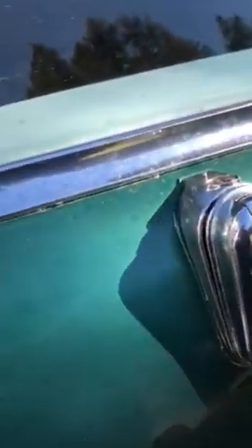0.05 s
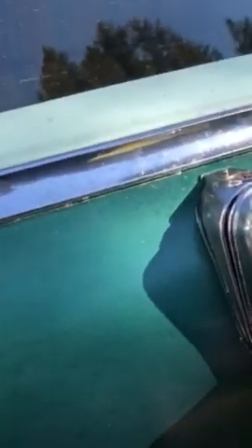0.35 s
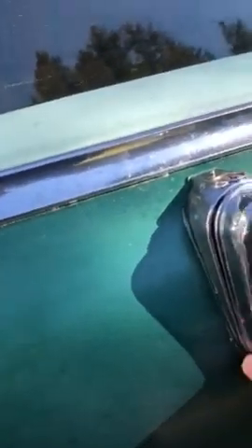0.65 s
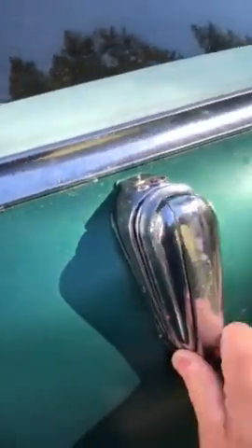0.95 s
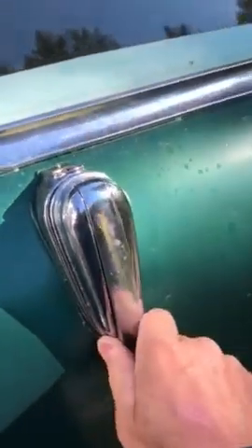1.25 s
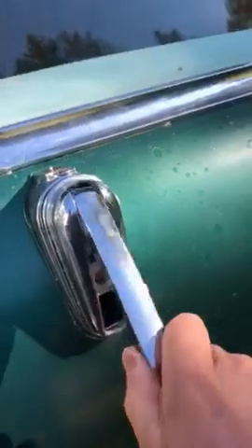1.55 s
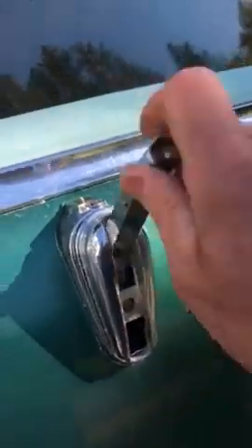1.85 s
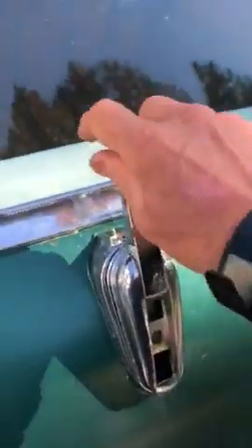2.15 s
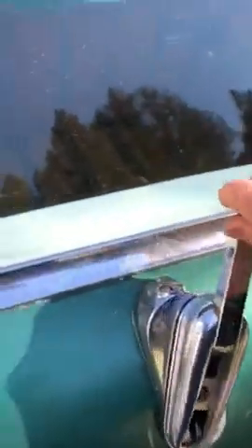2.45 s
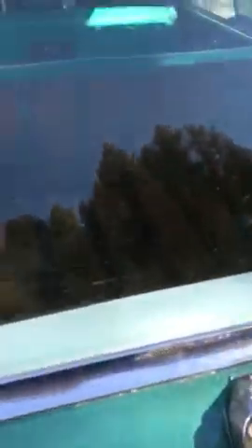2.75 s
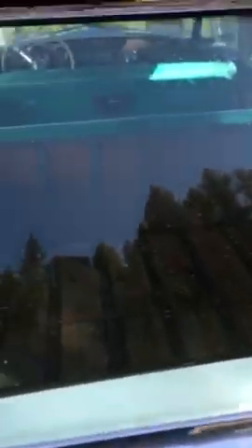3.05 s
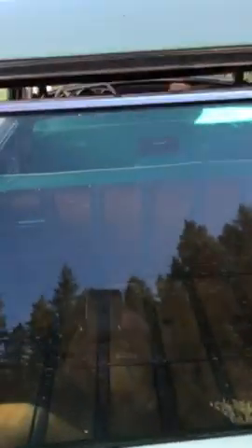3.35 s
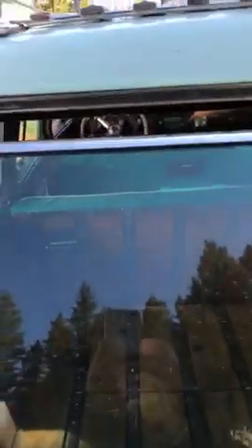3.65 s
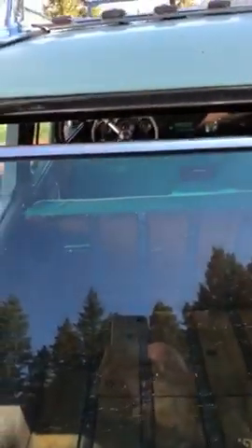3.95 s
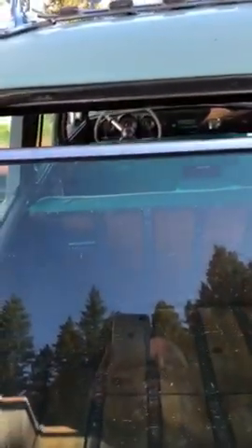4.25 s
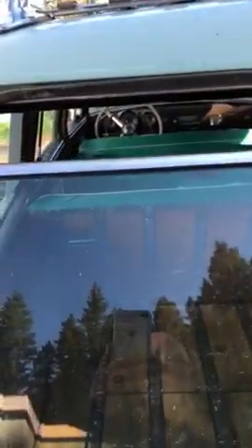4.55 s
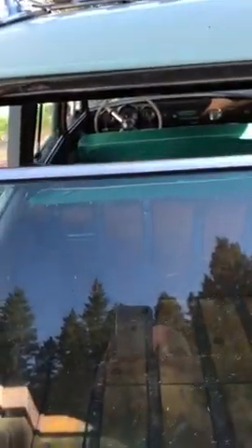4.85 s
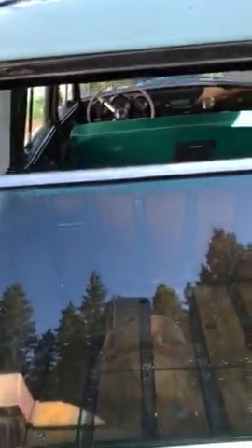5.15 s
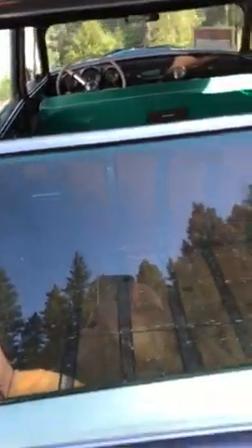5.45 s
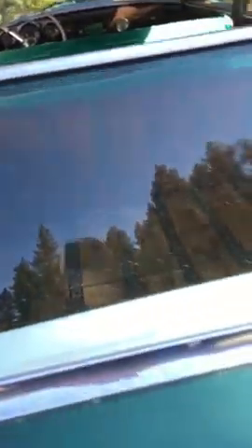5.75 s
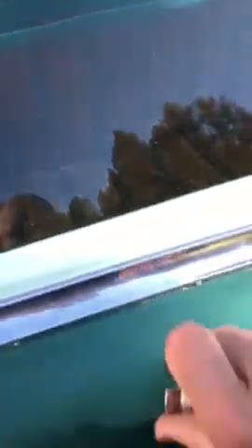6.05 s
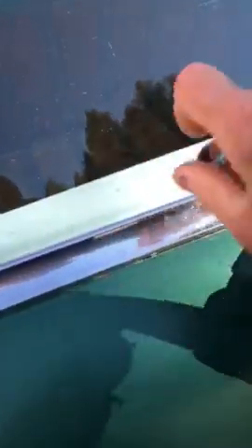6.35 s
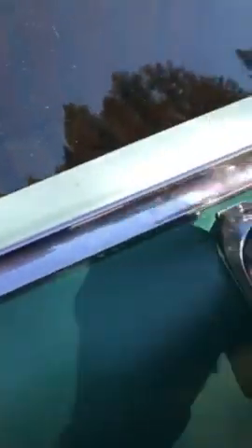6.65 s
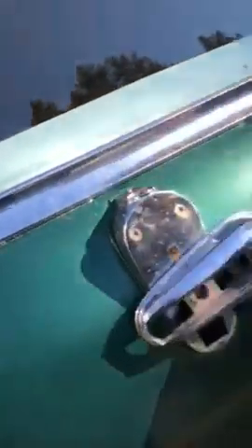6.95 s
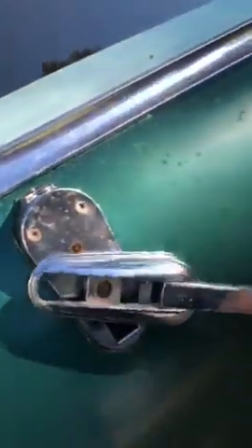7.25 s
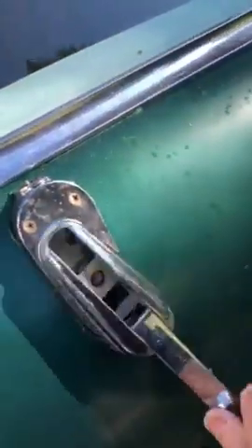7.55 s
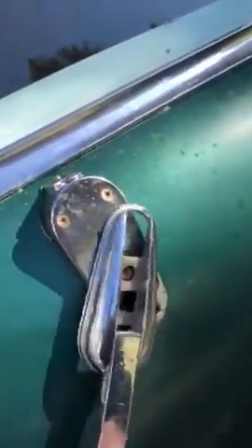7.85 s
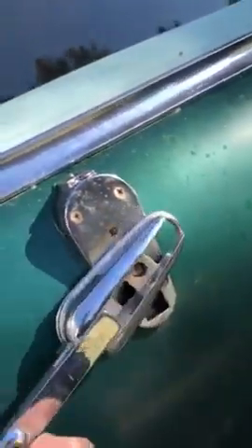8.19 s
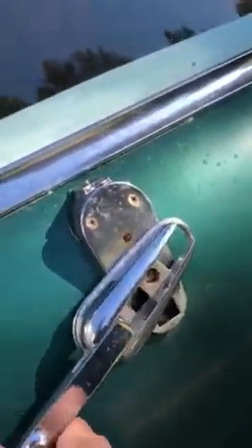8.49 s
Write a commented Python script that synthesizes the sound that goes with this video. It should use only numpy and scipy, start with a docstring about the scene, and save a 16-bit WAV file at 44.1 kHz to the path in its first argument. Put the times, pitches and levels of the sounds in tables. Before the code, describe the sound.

Close and dry, a chrome handle lock on an old vehicle clicks, squeaks on its pivot and snaps open with a short metallic ring. The hollow body gives soft low booms as a hand rubs over it, with scattered ticks and chinks of loose parts. Near the end the lever turns with a soft rub and a few more thumps. Faint open air and a far bird lie behind.

```python
"""A soft boom and the rub of a hand on the sheet-metal body of an old vehicle, outdoors.
The hand unfolds the chrome lever of a lock: it clicks, scrapes, squeaks on its pivot and snaps
against its stop. The body knocks and booms as the lock is worked and the lever is swung round,
rubbing; loose parts chink. Behind it: faint air, a thin high hiss and a far bird's few thin notes."""
import sys
import numpy as np
from scipy import signal
from scipy.fft import rfft, irfft, next_fast_len
from scipy.io import wavfile
from scipy.ndimage import map_coordinates

SR = 44100
rng = np.random.default_rng(int(sys.argv[2]) if len(sys.argv) > 2 else 0)


def generate_wav(signal):
    """Clip the signal to [-1, 1] and save it as 16-bit WAV at the path in sys.argv[1]."""
    frames = np.transpose(np.atleast_2d(signal))
    scaled = np.clip(frames, -1, 1) * 32767
    pcm = np.round(scaled).astype(np.int16)
    wavfile.write(sys.argv[1], SR, pcm)


N = 375732
T = np.arange(N) / SR

# air and far hiss over time: t/s, level/dB
AIR_LEVEL = [(0, -81.5), (1.3, -80), (2.6, -78.5), (4.2, -76.5), (7, -76), (8.52, -79)]
HISS_LEVEL = [(0, -81), (1.1, -82.5), (1.5, -86.5), (8.52, -100)]
# hoarse falling bird call: t/s, f/Hz, level/dB
BIRD_SLUR = [(1.13, 3520, -85), (1.185, 3440, -69), (1.21, 3100, -80), (1.24, 2570, -73), (1.29, 2300, -84)]
# whistled notes: t/s, length/s, first f/Hz, settled f/Hz, level/dB
BIRD_WHISTLES = [(4.593, 0.25, 4240, 3900, -72.5), (4.83, .18, 3900, 3870, -72.5),
                 (5.11, 0.24, 3290, 3365, -72), (5.328, .23, 3460, 3390, -75)]

# spectral shape of each source: f/Hz, relative level/dB
AIR_TONE = [(100, -2.5), (1000, 4.5), (2000, 4), (3400, 1), (5700, -3.5), (9000, -7), (15500, -11.5)]
HISS_TONE = [(3500, -29.5), (5300, -18.5), (7500, -31.5)]
RUMBLE_TONE = [(20, -26.5), (55, -2), (110, 1.5), (190, -0.5), (280, -13.5), (500, -29.5), (1500, -55)]
RUB_TONE = [(100, -18.5), (250, 4), (500, 1), (1100, -6.5), (2000, -16), (4000, -27.5), (9000, -36.5),
            (16000, -57)]
SWIVEL_TONE = [(400, -15.5), (950, 1.5), (1500, -6.5), (4000, -17), (9000, -25), (16000, -38)]
FLEX_TONE = [(22, -19.5), (52, 6), (110, -6), (220, -5), (400, -25.5), (1500, -74)]
SCRAPE_TONE = [(150, -13), (700, 13), (1700, 2.5), (3500, -8.5), (6000, -21), (8500, -23), (15500, -31)]
PANEL_TONE = [(80, -34), (220, 6), (500, 0), (900, 1), (1500, -7.5), (2500, -17), (5000, -32.5),
              (16000, -48.5)]
STEEL_TONE = [(100, -18), (400, -3), (1000, 5), (2000, 5), (3500, -6), (5000, -6), (6500, -22), (8000, -37),
              (16000, -47)]
CRACK_TONE = [(3000, 5), (6500, -1), (8500, 6), (11000, -3.5), (13000, -10.5), (15500, -5.5)]
# resonances of panel, steel lever and lock housing: f/Hz, width/Hz, lift/dB
PANEL_MODES = [(404, 26, 5), (484.7, 15, 10), (622.5, 10.5, 8.5), (728, 58, 3), (817, 18, 8),
               (917, 46, 5.5), (1160, 14, 5), (1230, 47, 5.5), (1240, 58, 3.5), (1444, 15, -6),
               (1710, 20, -7)]
STEEL_MODES = [(1710, 270, 6.1), (2010, 140, 11.4), (2500, 73, 3.9), (3270, 230, 9), (3900, 170, 4.9),
               (5580, 310, 9.8), (6240, 210, 9.7), (8150, 360, 3.8), (9000, 300, 4.3), (13000, 340, 7),
               (13900, 200, 5)]
HOUSING_MODES = [(966, 70, 11), (1145, 59, 9.4), (2150, 340, 9.5), (2990, 110, 12), (3780, 180, 12),
                 (8260, 270, 5.7)]
# lever ringing on its stop: f/Hz, level/dB, t60/s
STOP_MODES = [(480, -41, 0.18), (611, -37, 0.14), (1140, -46, 0.12), (1274, -42, 0.096), (740, -38, 0.071),
              (1998, -31, 0.051), (3170, -32.5, 0.032), (3290, -31.5, 0.026), (3290, -56, 0.14),
              (4070, -38.5, 0.035), (6290, -48, 0.046), (12960, -36, 0.022), (14800, -40, .014)]

# movements: peak t/s, level/dB, rise and fall time constant/s
HAND_STROKES = [(0, -54, 0.11), (0.28, -63.5, 0.089), (1.58, -56, 0.1), (2.08, -57.5, 0.21),
                (2.98, -54, 0.12), (3.3, -62.5, 0.093), (3.73, -63, 0.089), (4.39, -66, 0.32),
                (5.38, -64.5, 0.19), (5.93, -63.5, 0.16), (7.58, -63.5, 0.23), (8.52, -63.5, 0.053)]
LOCK_TURNS = [(7.1, -75, 0.3), (7.43, -66.5, 0.068), (7.6, -65, 0.07), (8.07, -67, 0.29)]
FINGER_SLIDE = [(8.13, -69, .07)]
STEEL_SCRAPES = [(1.49, -55, .025), (1.64, -53, 0.014), (1.9, -60, 0.014), (2.075, -49.5, 0.019),
                 (2.915, -57.5, 0.039), (5.39, -64.5, .06), (7.43, -68, .04)]
# loose parts landing: t/s, level/dB, f/Hz
CHINKS = [(0.379, -71, 8250), (1.829, -57.5, 2400), (1.829, -67, 4300), (2.068, -63, 8260),
          (4.572, -65, 5090), (4.597, -71, 5090), (4.597, -72, 11283), (4.679, -69, 11283),
          (4.716, -63, 11350), (4.76, -70, 11283), (5.345, -75.5, 9050), (5.4, -75, 9050),
          (6.492, -70, 6570), (6.579, -72, 6700), (6.627, -72, 6570)]
# steel-on-steel clicks: t/s, level/dB, centre f/Hz
TICKS = [(0.338, -46.5, 1290), (1.461, -52, 1300), (1.5161, -33.5, 1700), (1.6262, -55, 1900),
         (1.6432, -50, 1900), (1.745, -51.5, 3470), (1.829, -42.5, 1900), (2.0395, -49, 1900),
         (2.0683, -38.5, 2100), (2.292, -48, 830), (2.42, -49, 2690), (2.518, -55, 3800),
         (2.582, -52.5, 3200), (2.635, -50, 900), (3.218, -61, 7900), (3.272, -53, 1100),
         (3.592, -51, 5200), (3.612, -56.5, 4840), (3.778, -59, 3530), (3.826, -60, 3130),
         (3.887, -53, 3040), (3.964, -48, 690), (4.013, -55.5, 1510), (4.571, -56, 4960),
         (4.572, -56, 13000), (5.755, -63, 4000), (7.41, -62, 2200), (7.545, -52, 450),
         (8.473, -49.5, 2070)]
# pivot squeak, one list per mode: t/s, f/Hz, level/dB
SQUEAKS = [
    [(1.575, 1387, -77), (1.607, 1318, -48), (1.622, 1237, -51), (1.647, 1243, -45.5), (1.69, 1216, -71)],
    [(1.67, 3400, -80), (1.7, 3550, -66), (1.725, 3320, -80)],
    [(1.705, 750, -68), (1.722, 728, -49.5), (1.76, 702, -45.5), (1.778, 718, -52.5), (1.83, 635, -52.5)],
]
# soft bumps that only boom the body: t/s, level/dB, f/Hz
BUMPS = [(0.003, -43, 141), (0.003, -48, 288), (0.003, -54.5, 527), (0.671, -42.5, 66.4),
         (0.872, -47.5, 78.6), (1.375, -47, 159.2), (1.41, -41, 161), (2.185, -35.5, 115.8),
         (2.471, -44.5, 123), (2.732, -35, 123), (2.968, -50.5, 445.3), (2.99, -41.5, 185.6),
         (3.97, -41, 128.7), (4.004, -41.5, 124.2), (4.998, -44.5, 131), (7.145, -46.5, 124.3),
         (7.195, -46.5, 75), (7.423, -44, 130.4), (7.537, -44.5, 95), (7.635, -37, 101.6)]
# blows of the lock: t/s, level/dB, hardness/0-1, boom f/Hz
KNOCKS = [(0.379, -53, 0.33, 92.5), (1.4986, -46.5, 1, 155.7), (1.8977, -46.5, 0.1, 117),
          (1.9197, -44.5, 0.77, 123.6), (1.948, -53, .6, 123.3), (2.101, -35.5, 0.94, 115.5),
          (2.9079, -52.5, 0.98, 136.3), (2.968, -52, 0, 117.5), (4.7029, -48.5, 0.58, 151.6),
          (5.317, -54, 0, 161.5), (5.4133, -52.5, 0.16, 182.2), (5.9035, -59, 0, 130.5),
          (6.5096, -47.5, 0.77, 149.5), (7.625, -54.5, 0.4, 101), (8.4731, -61.5, 0.1, 179)]


def amp(db):
    """Decibels to gain."""
    return 10 ** (np.asarray(db) / 20)


def unit(x):
    """Scale to rms 1."""
    return x / np.sqrt(np.mean(x ** 2) + 1e-20)


def noise():
    """White noise, rms 1."""
    return rng.standard_normal(N)


def curve(rows, column=1):
    """One column of a timed table, per sample."""
    rows = np.asarray(rows)
    return np.interp(T, rows[:, 0], rows[:, column])


def wobble(rate_hz):
    """Smooth random curve, rate_hz knots a second."""
    knots = rng.standard_normal(int(N * rate_hz / SR) + 2)
    fine = map_coordinates(knots, [np.arange(10 * len(knots)) / 10], mode="nearest")
    return np.interp(10 * rate_hz * T, np.arange(len(fine)), fine)


def swells(rows):
    """Gain of movements that rise to a peak and fall as fast."""
    return np.sqrt(sum((amp(db) * np.exp(-abs(T - s) / tau_s)) ** 2 for s, db, tau_s in rows))


def fade(t, t60_s, attack_s):
    """Rise and exponential decay, peak 1."""
    shape = amp(-60 * t / t60_s) * (1 - np.exp(-t / attack_s))
    return shape / shape.max()


def add(track, start_s, sound):
    """Mix a sound into the track."""
    start = max(0, round(start_s * SR))
    track[start:start + len(sound)] += sound[:N - start]


def colour(x, tone, modes=(), lift_scale=1, size=8192):
    """Minimum-phase filter from a spectrum and resonances; white noise keeps its power."""
    hz = np.fft.rfftfreq(size, 1 / SR)
    tone_hz, tone_db = np.transpose(tone)
    db = np.interp(np.log(hz + 1), np.log(tone_hz), tone_db)
    for centre_hz, width_hz, lift_db in modes:
        db += lift_scale * lift_db / (1 + (2 * (hz - centre_hz) / width_hz) ** 2)
    cepstrum = irfft(np.log(amp(db)))
    cepstrum[1:size // 2] *= 2
    cepstrum[size // 2 + 1:] = 0
    response = irfft(np.exp(rfft(cepstrum)))
    return signal.fftconvolve(x, response / np.linalg.norm(response))[:N]


def glide(rows, jitter, flutter_db, overtone_db):
    """Gliding tone with two overtones, unsteady in pitch and level."""
    out = np.zeros(N)
    on = (T > rows[0][0]) & (T < rows[-1][0])
    hz = curve(rows) * (1 + jitter * wobble(300))
    phase = 2 * np.pi * np.cumsum(hz[on]) / SR
    wave = sum(amp(k * overtone_db) * np.sin((k + 1) * phase) for k in range(3))
    level_db = curve(rows, column=2) + flutter_db * wobble(60)
    out[on] = amp(level_db[on]) * wave * signal.windows.tukey(len(wave), 0.1)
    return out


def blows(times_s, levels_db, t60_s, attack_s, tail_db, tail_t60_s, ripple_db, spacing_hz):
    """Dense bursts, a quick decay over a longer one; each contact point favours other modes."""
    out, t = np.zeros(N), np.arange(SR // 2) / SR
    hz = np.fft.rfftfreq(len(t), 1 / SR)
    shape = np.hypot(fade(t, t60_s, attack_s), amp(tail_db) * fade(t, tail_t60_s, attack_s))
    for s, db in zip(times_s, levels_db):
        ripple = map_coordinates(rng.standard_normal(1024), [hz / spacing_hz], mode="wrap")
        spectrum = rfft(rng.standard_normal(len(t))) * amp(ripple_db * ripple)
        add(out, s, amp(db) * shape * unit(irfft(spectrum, len(t))))
    return out


def outdoors():
    """Soft moving air and a thin far hiss."""
    air = amp(curve(AIR_LEVEL) + 1.5 + 0.5 * wobble(5)) * colour(noise(), AIR_TONE)
    hiss = amp(curve(HISS_LEVEL) + wobble(25)) * colour(noise(), HISS_TONE)
    return air + hiss


def bird(settle_s=0.06, arch_db=7, gain_db=-0.5):
    """A far bird: one hoarse slur, then pure notes that slide to pitch, softer at their ends."""
    song = glide(BIRD_SLUR, jitter=0.03, flutter_db=4.5, overtone_db=-35)
    for s, length_s, first_hz, settled_hz, db in BIRD_WHISTLES:
        t = np.linspace(0, length_s)
        hz = settled_hz + (first_hz - settled_hz) * np.exp(-t / settle_s)
        level_db = db - arch_db * (2 * t / length_s - 1) ** 2
        note = np.column_stack([s + t, hz, level_db])
        song += glide(note, jitter=0.0017, flutter_db=1, overtone_db=-42)
    return amp(gain_db) * song


def handling(rest_db=-71.5, rumble_rest_db=-62, rumble_exponent=0.95):
    """The hand rubs unevenly over the panel; a lumpy rumble rises with each stroke."""
    effort = np.hypot(amp(rest_db), swells(HAND_STROKES))
    friction = noise() * unit(amp(2.03 * wobble(70)))
    rub = effort * colour(friction, RUB_TONE, PANEL_MODES, lift_scale=0.36)
    lumps = unit(amp(3 * wobble(18))) * noise()
    rumble_gain = amp(rumble_rest_db) * (effort / amp(rest_db)) ** rumble_exponent
    return rub + rumble_gain * colour(lumps, RUMBLE_TONE)


def swivel(flex_db=8):
    """The lock grinds round in its hollow housing and flexes the panel; fingers hiss on the chrome."""
    friction = noise() * unit(amp(3 * wobble(70)))
    grind = colour(friction, SWIVEL_TONE, HOUSING_MODES)
    flex = amp(flex_db) * colour(noise(), FLEX_TONE)
    fingers = amp(1.6 * wobble(40)) * colour(noise(), AIR_TONE)
    return swells(LOCK_TURNS) * (grind + flex) + swells(FINGER_SLIDE) * fingers


def chinks(jitter=0.0067, flutter_db=2.5, click_db=-6, rebound_s=0.024, rebound_db=-5):
    """A loose part lands with a tiny click, rings on one unsteady tone and rebounds once."""
    out, t = np.zeros(N), np.arange(SR // 2) / SR
    drift, flutter = wobble(400), wobble(90)
    for s, db, hz in CHINKS:
        span = round(s * SR) + np.arange(len(t))
        phase = 2 * np.pi * hz * np.cumsum(1 + jitter * drift[span]) / SR
        ring = amp(flutter_db * flutter[span]) * np.sin(phase) * fade(t, t60_s=0.064, attack_s=0.0003)
        click = amp(click_db) * rng.standard_normal(len(t)) * fade(t, t60_s=0.0084, attack_s=0.00073)
        add(out, s, amp(db) * (ring + click))
        add(out, s + rebound_s, amp(db + rebound_db) * (ring + click))
    return out


def ticks(half_width_oct=0.38, gain_db=-9):
    """Light touches: tiny bursts, each in its own band, that ring the steel a little."""
    out, t = np.zeros(N), np.arange(SR // 8) / SR
    hz = np.fft.rfftfreq(len(t), 1 / SR) + 1
    for s, db, centre_hz in TICKS:
        band = 1 / (1 + (np.log2(hz / centre_hz) / half_width_oct) ** 2)
        burst = unit(irfft(rfft(rng.standard_normal(len(t))) * band, len(t)))
        add(out, s, amp(db + gain_db) * burst * fade(t, t60_s=0.057, attack_s=0.00032))
    return colour(out, tone=[(1000, 0.29), (16000, 1.1)], modes=STEEL_MODES, lift_scale=0.4)


def scrapes(grain_db=5):
    """Dry steel drags over steel, catching in gritty grains that ring the lever."""
    grains = noise() * unit(amp(grain_db * wobble(220)))
    return colour(swells(STEEL_SCRAPES) * grains, SCRAPE_TONE, STEEL_MODES, lift_scale=0.62)


def pivot(squeak_db=-1, rasp_db=-15):
    """The dry pivot sticks and slips: a falling squeak that rasps through the steel."""
    squeak = sum(glide(rows, jitter=0.035, flutter_db=1, overtone_db=-17) for rows in SQUEAKS)
    rasp = colour(squeak * noise(), STEEL_TONE, STEEL_MODES)
    return amp(squeak_db) * squeak + amp(rasp_db) * rasp


def booms(knock_lift_db=8.5, upper_ratio=1.36, upper_db=-7, cluster_db=-9, gain_db=-0.5):
    """Knocks and bumps swing the hollow body in a low mode, an upper one and weaker neighbours."""
    out, t = np.zeros(N), np.arange(SR // 2) / SR
    knocks = [(s, db + knock_lift_db, hz) for s, db, _, hz in KNOCKS]
    for s, db, hz in knocks + list(BUMPS):
        t60_s = min(0.22 * (hz / 124.3) ** 1.36, 0.39)  # lower booms die sooner
        detune, phase = rng.standard_normal((2, 8, 1))
        neighbours = np.sin(2 * np.pi * (hz * np.exp(0.35 * detune) * t + phase))
        cluster = amp(cluster_db) * neighbours.sum(0) / np.sqrt(len(neighbours))
        swing = np.sin(2 * np.pi * hz * t) + amp(upper_db) * np.sin(2 * np.pi * upper_ratio * hz * t)
        add(out, s, amp(db + gain_db) * (swing + cluster) * fade(t, t60_s, attack_s=0.0066))
    return out


def snap(start_s=2.1012, detune=0.0037):
    """The sprung lever snaps open against its stop and rings briefly in its own modes."""
    out, t = np.zeros(N), np.arange(SR // 4) / SR
    for hz, db, t60_s in STOP_MODES:
        mode_hz = hz * (1 + detune * rng.standard_normal())
        phase = 2 * np.pi * (mode_hz * t + rng.random())
        add(out, start_s, amp(db) * np.sin(phase) * fade(t, t60_s, attack_s=0.00041))
    return out


def lock():
    """Each blow clatters the panel; the harder it is, the more lever ring and bright crack."""
    s, db, hardness, _ = np.transpose(KNOCKS)
    crack = blows(s, db - 33 + 37.5 * hardness, t60_s=0.015, attack_s=0.0012,
                  tail_db=-21, tail_t60_s=0.068, ripple_db=-0.5, spacing_hz=258.6)
    lever = blows(s, db - 17 + 22 * hardness, t60_s=0.051, attack_s=0.00049,
                  tail_db=-27, tail_t60_s=0.11, ripple_db=3, spacing_hz=111.5)
    panel = blows(s, db + 2, t60_s=0.13, attack_s=0.0011,
                  tail_db=-6, tail_t60_s=0.26, ripple_db=1.5, spacing_hz=39.63)
    return (colour(crack, CRACK_TONE, STEEL_MODES)
            + colour(lever, STEEL_TONE, STEEL_MODES)
            + colour(panel, PANEL_TONE, PANEL_MODES))


def scene():
    """Close, dry lock and body over the open-air background; mono."""
    mechanism = lock() + scrapes() + snap() + ticks() + chinks() + pivot() + swivel()
    return (mechanism + booms() + bird() + handling() + outdoors())[None]


def record(dry, cutoff_hz=15850):
    """Brick-wall low-pass."""
    size = next_fast_len(N + SR // 2)
    passband = np.fft.rfftfreq(size, 1 / SR) < cutoff_hz
    return irfft(rfft(dry, size) * passband, size)[:, :N]


dry = scene()
out = record(dry)
generate_wav(out)
```